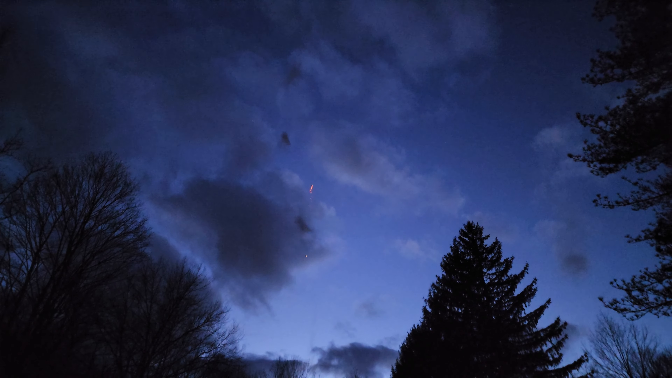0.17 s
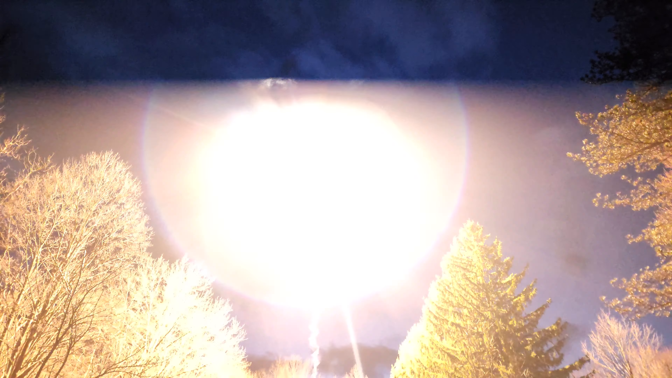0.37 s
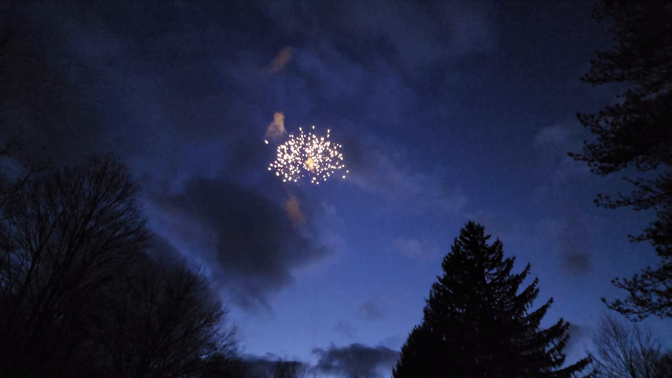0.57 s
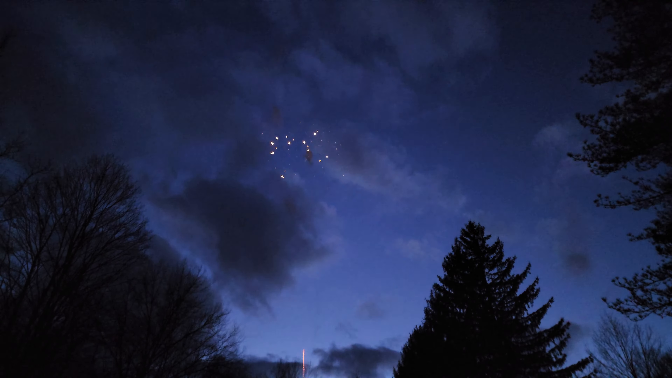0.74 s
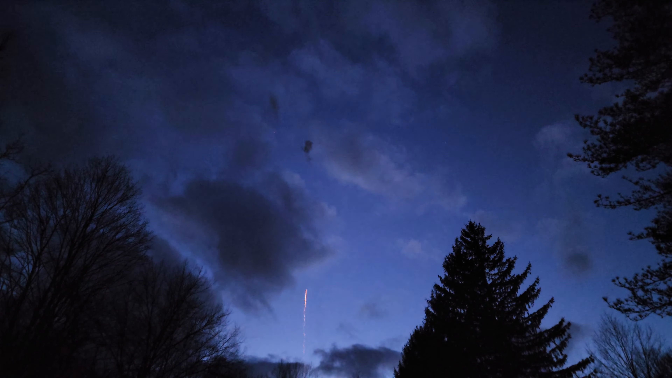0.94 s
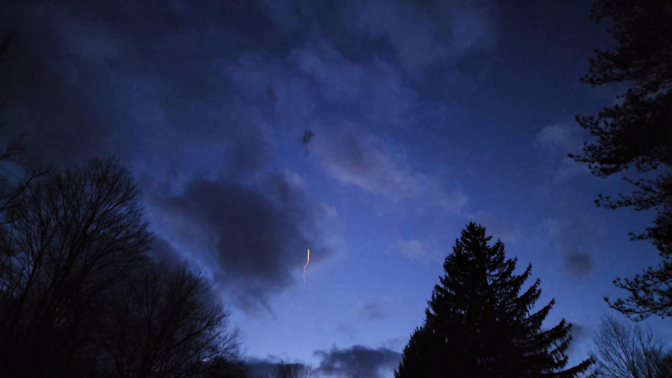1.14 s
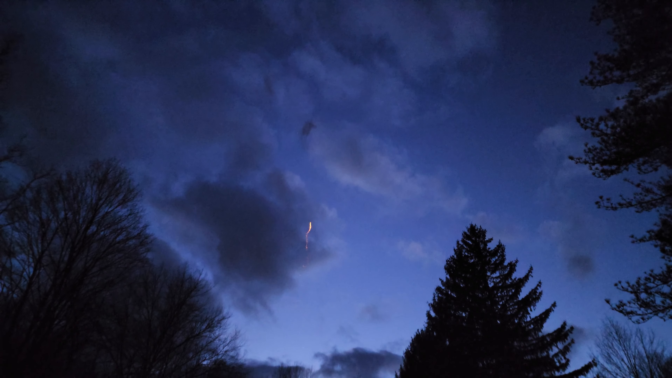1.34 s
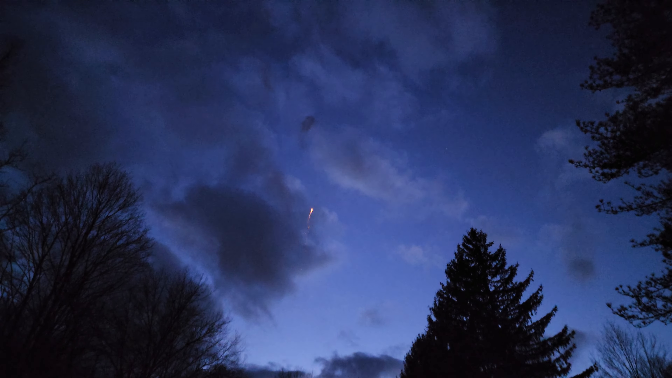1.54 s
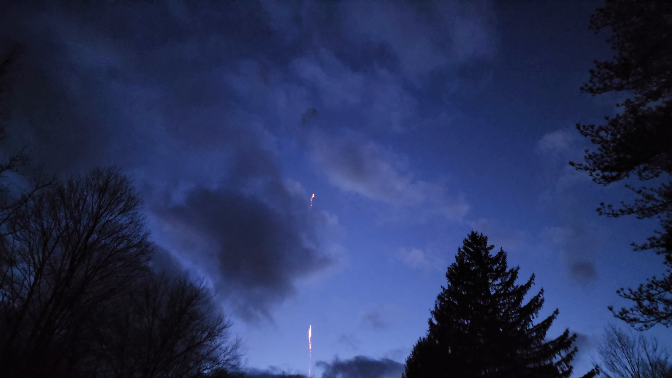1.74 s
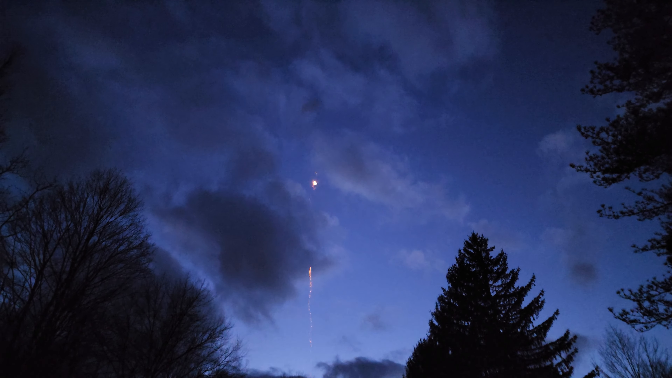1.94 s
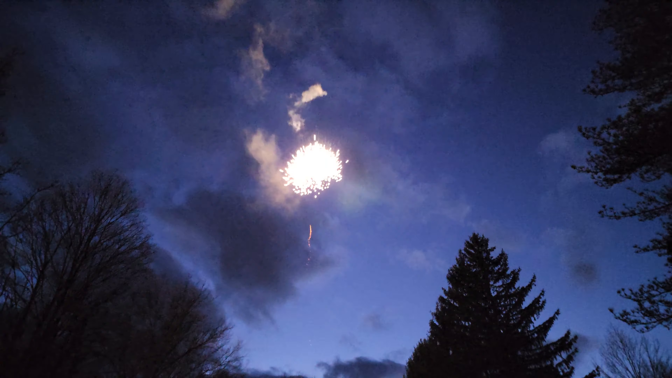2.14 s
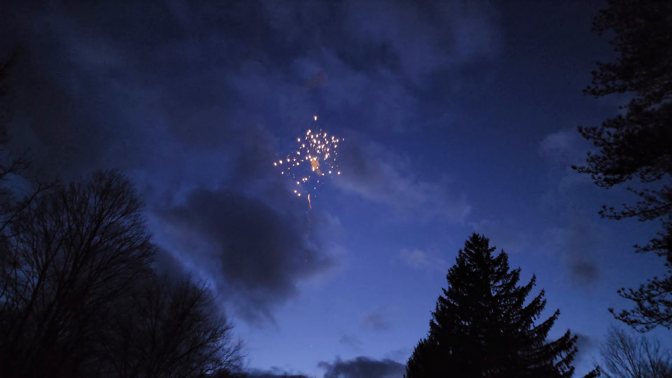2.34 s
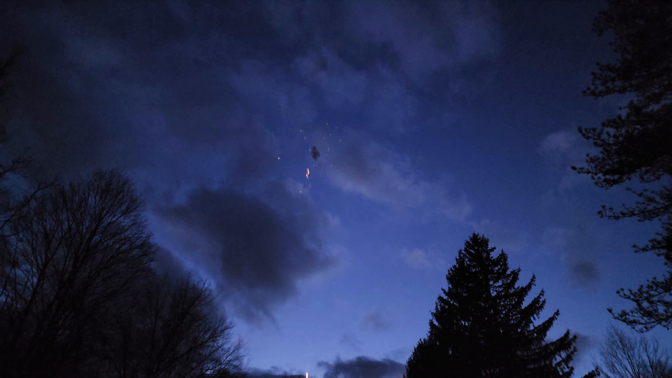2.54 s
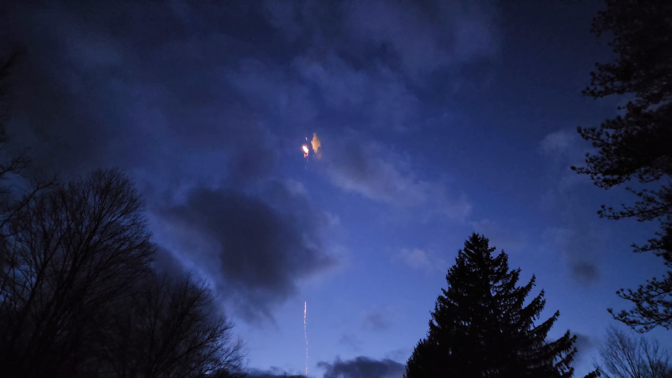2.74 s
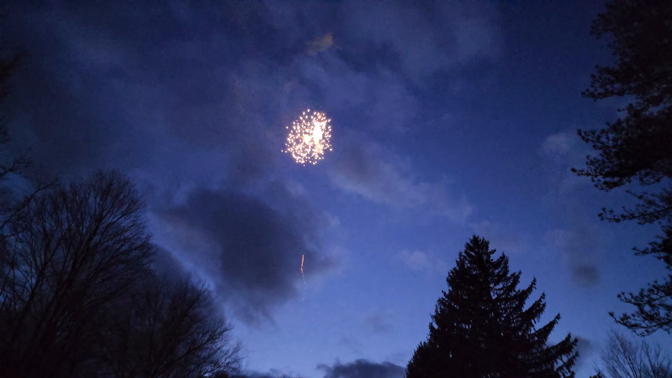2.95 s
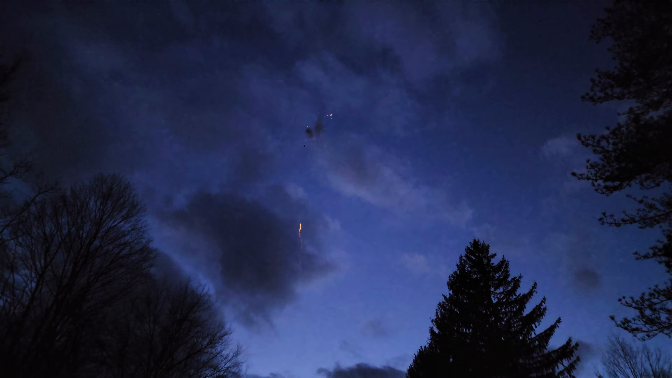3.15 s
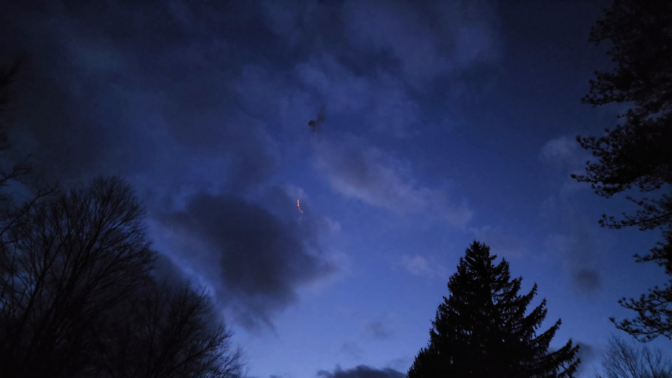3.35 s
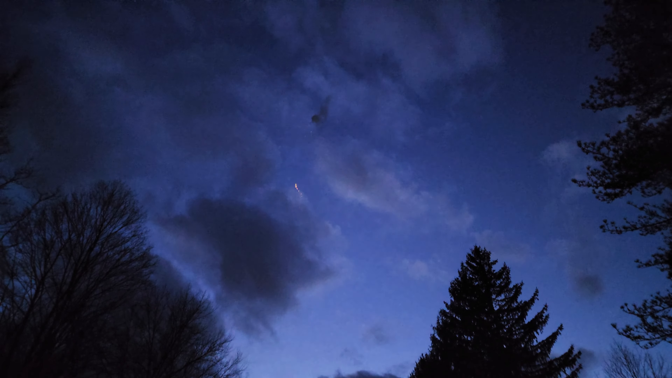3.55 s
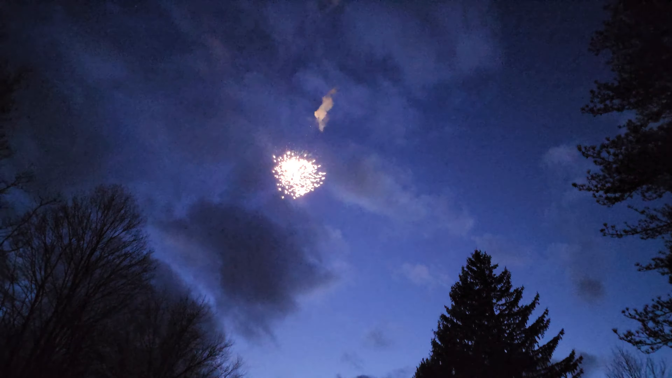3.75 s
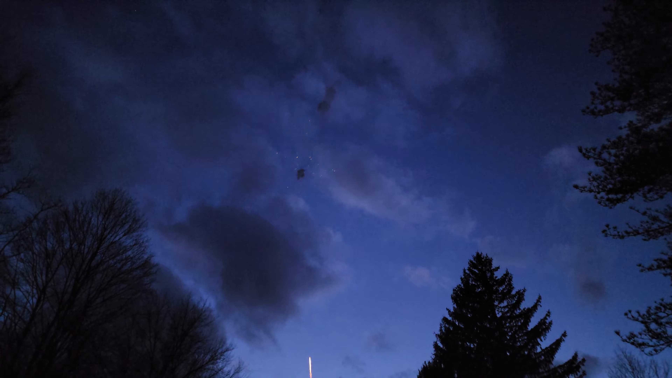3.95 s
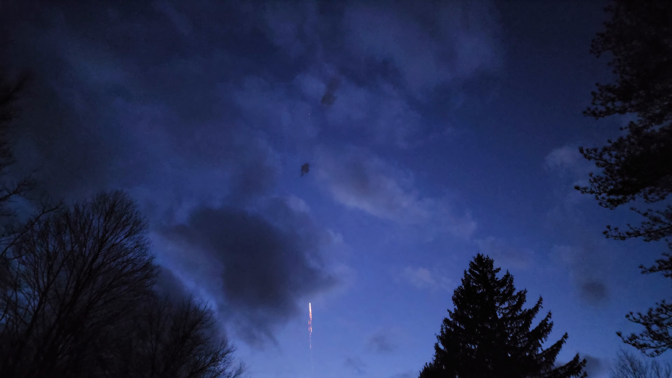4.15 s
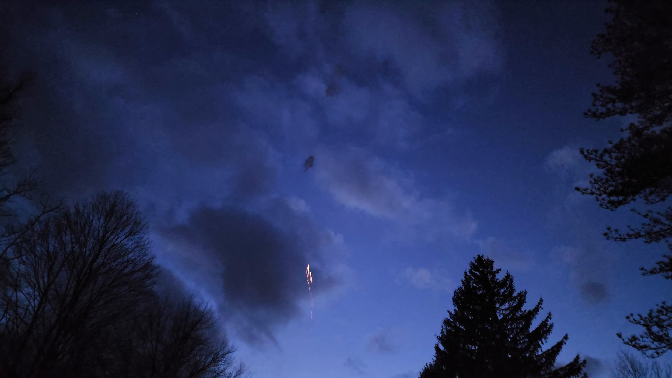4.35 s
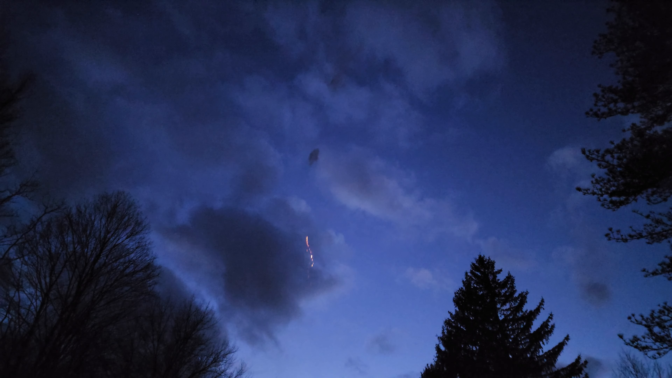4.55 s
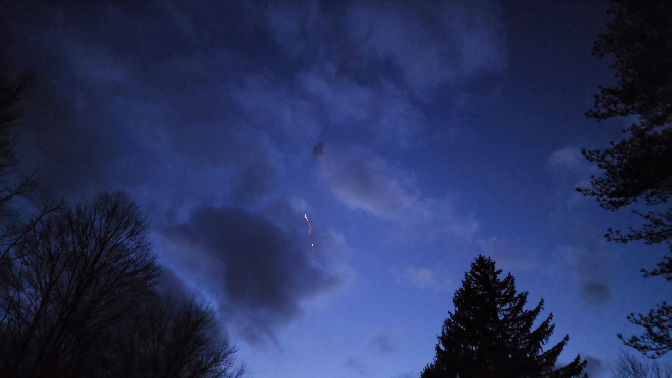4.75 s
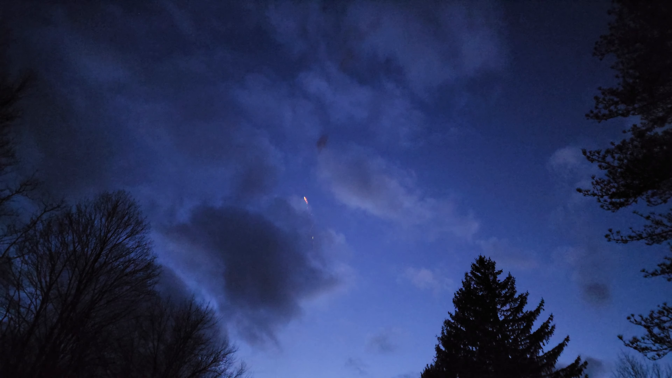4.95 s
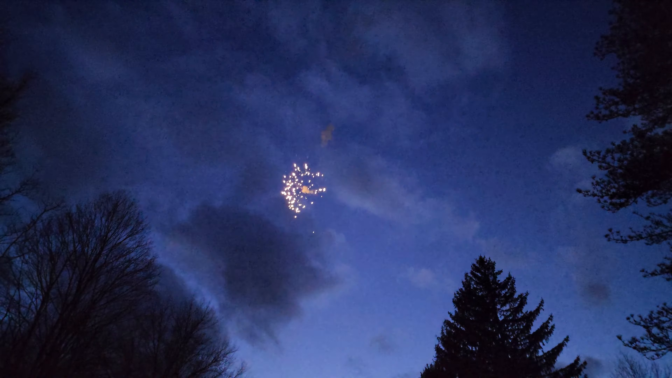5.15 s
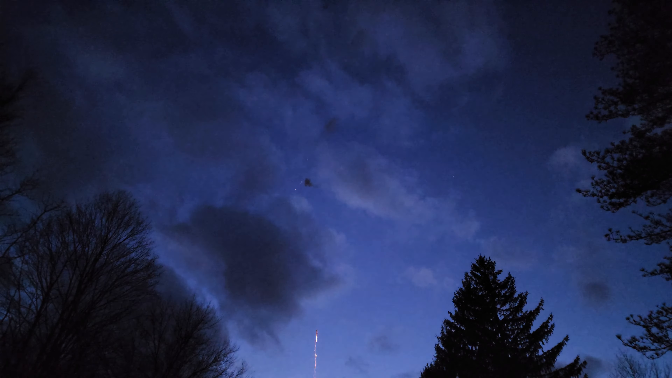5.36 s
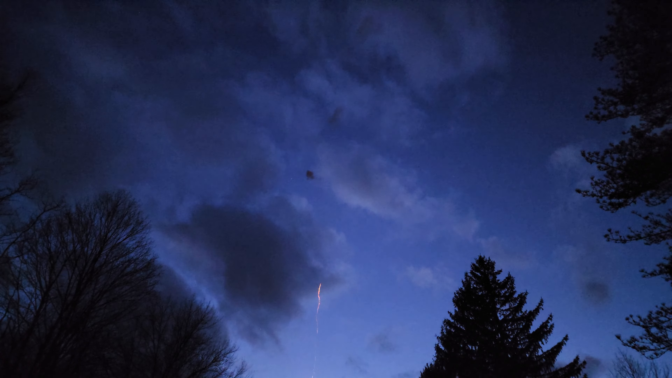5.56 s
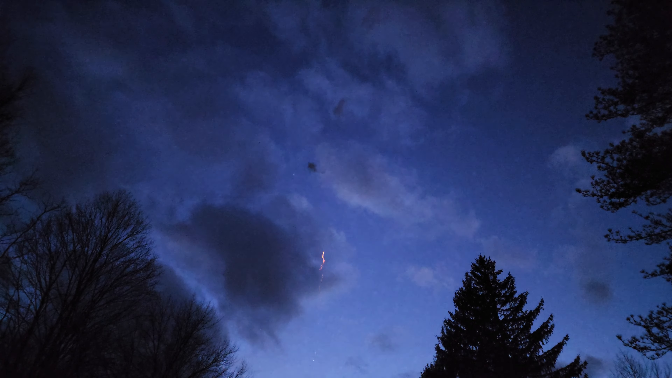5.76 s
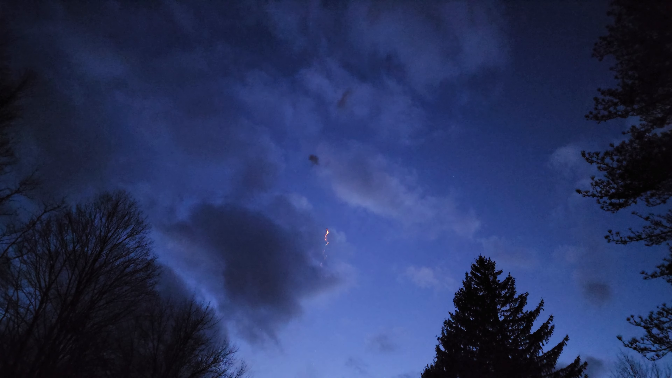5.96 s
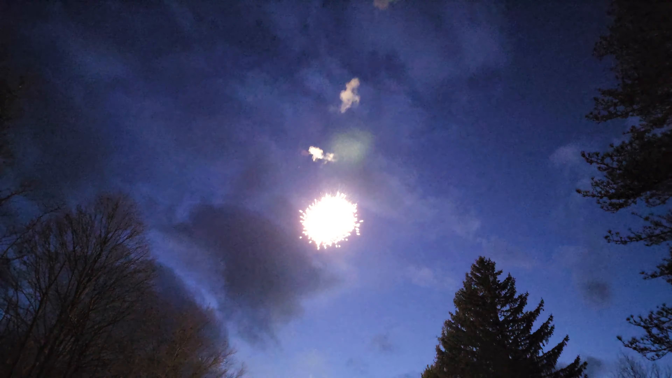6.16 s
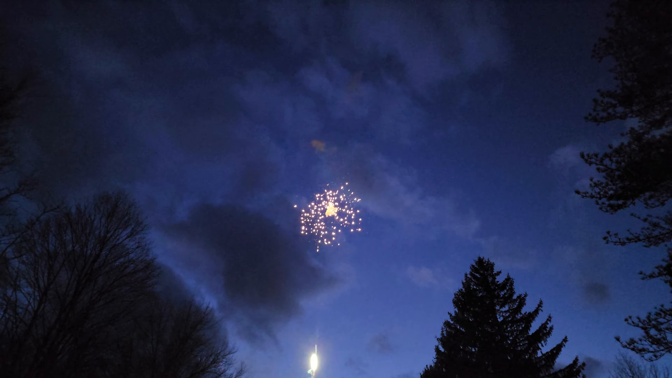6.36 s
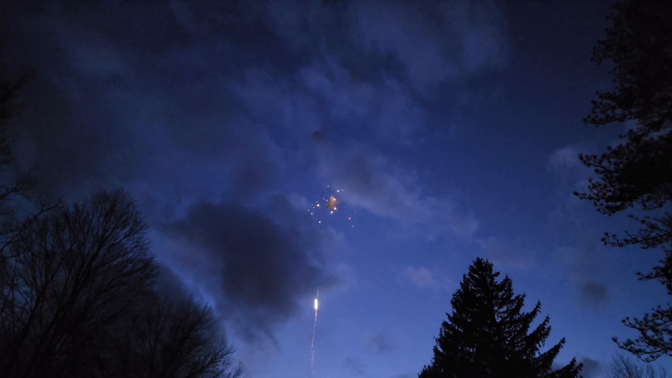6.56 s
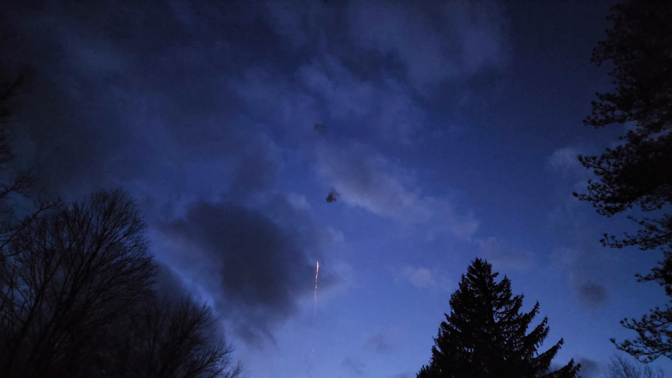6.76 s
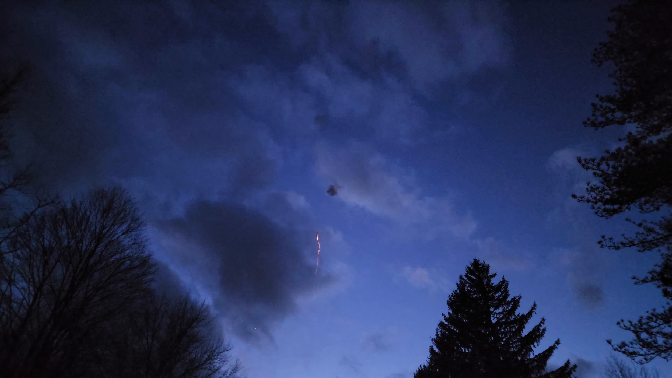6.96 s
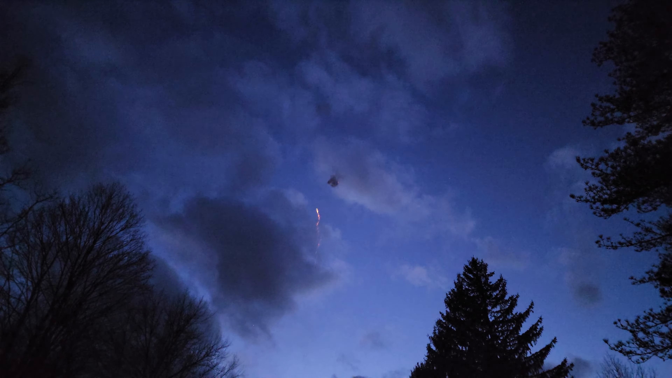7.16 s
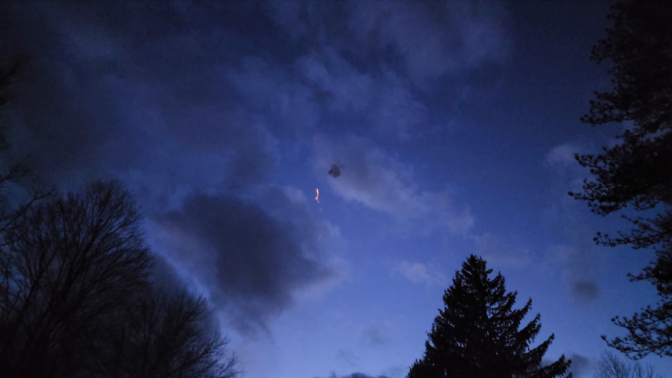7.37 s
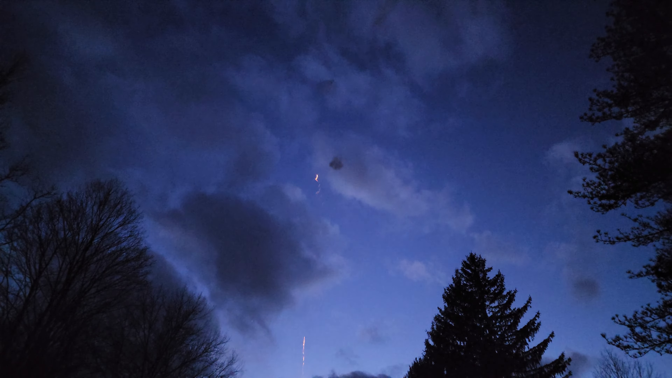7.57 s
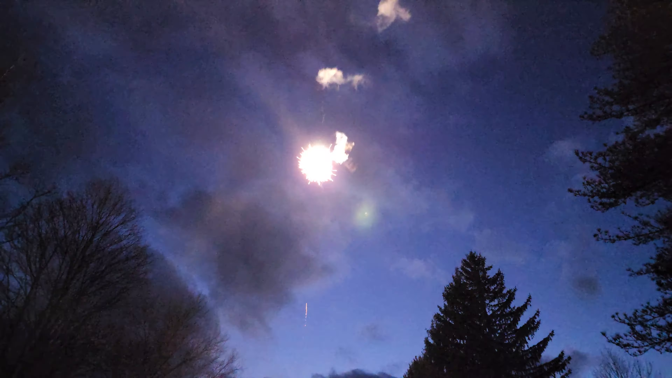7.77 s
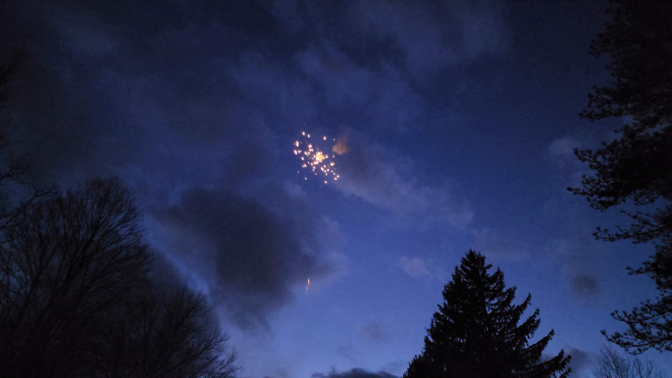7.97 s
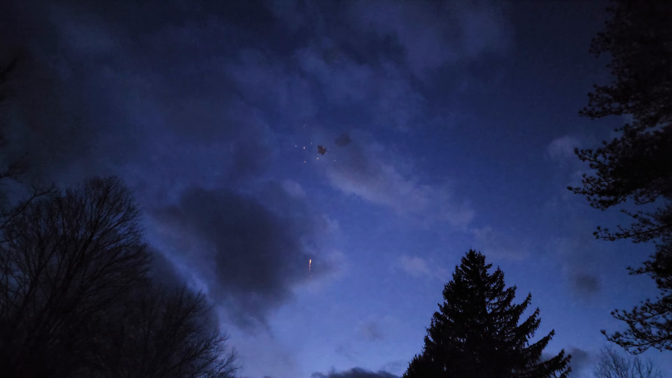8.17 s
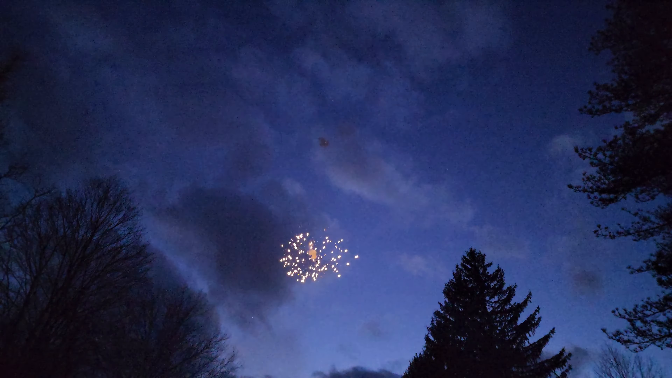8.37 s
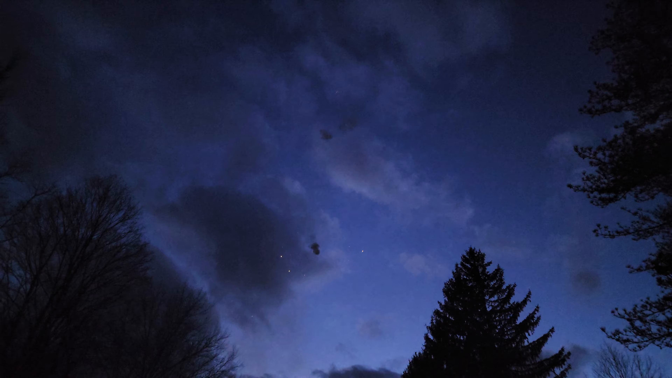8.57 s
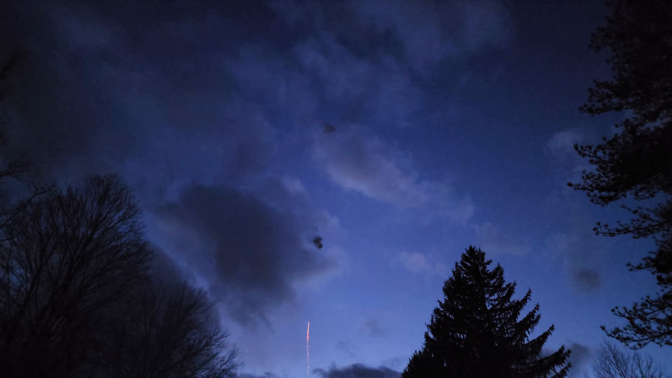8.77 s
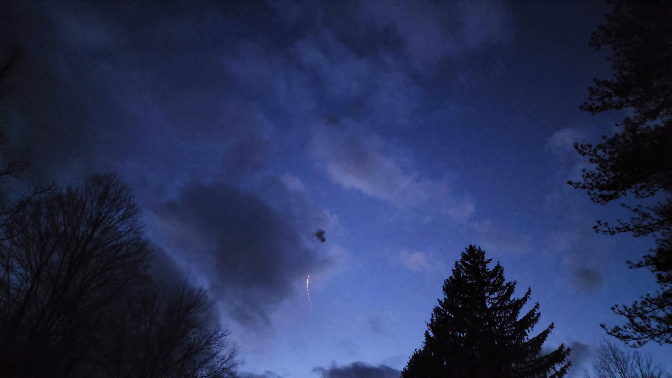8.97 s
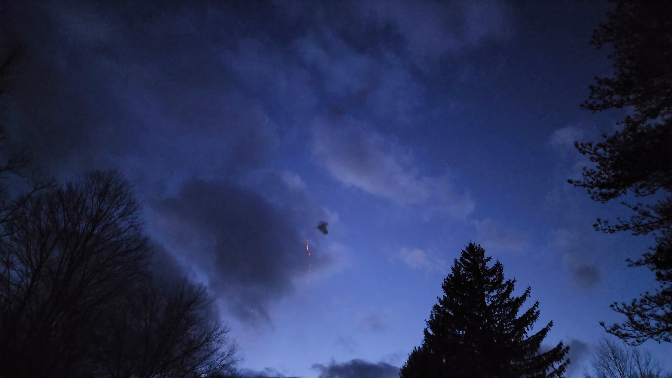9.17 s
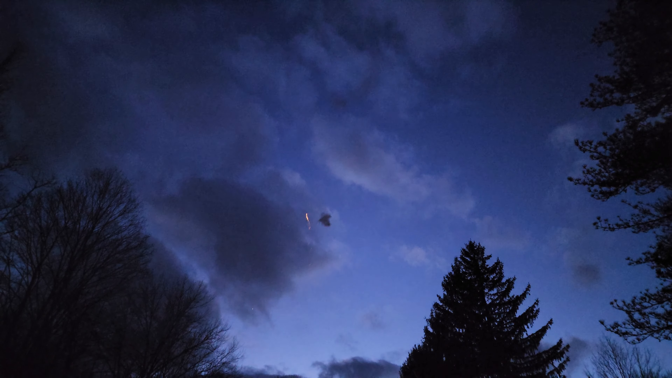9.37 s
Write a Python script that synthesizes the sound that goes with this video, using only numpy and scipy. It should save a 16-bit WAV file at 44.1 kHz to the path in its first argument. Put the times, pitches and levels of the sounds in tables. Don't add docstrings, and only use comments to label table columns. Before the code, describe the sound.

A firework cake fires at uneven intervals: a pop from the tube with a small crack and gas spit, then sharp overhead bursts that clip the small microphone. Echoes slap back within a third of a second from left and right, and the trees scatter a wide tail that loses brightness and dies away. Faint traffic and hiss lie beneath; tiny debris ticks are barely audible.

```python
import sys
import numpy as np
from scipy import signal
from scipy.fft import rfft, irfft, next_fast_len
from scipy.io import wavfile

SR = 44100
rng = np.random.default_rng(int(sys.argv[2]) if len(sys.argv) > 2 else 0)


def boost_factor(decibels):
    exponent = np.asarray(decibels, float) / 20
    return 10 ** exponent


def to_wav(s):
    ch = np.atleast_2d(s).T
    pcm = np.round(np.clip(ch, -1, 1) * 32767)
    wavfile.write(sys.argv[1], SR, pcm.astype(np.int16))


N = 415863

# f/Hz, level/dB per Hz
YARD_COLOUR = [(18, -18.5), (30, -27), (93, -9.5), (145, -15), (252, -13), (319, -23), (486, -20.5),
               (526, -26), (780, -24), (1220, -28), (1670, -31.5), (2610, -48.5), (16000, -89.5)]
# f/Hz, likeness/-1 to 1
LIKENESS = [(60, 1), (130, 0.97), (290, 0.87), (640, -0.069), (1410, -0.18), (3100, 0.094), (6820, -0.14),
            (15000, 0.26)]
# f/Hz, level/dB per Hz
SCATTER_COLOUR = [(40, -20), (106, -10.5), (243, 0), (340, 0.6), (560, -4.5), (1550, -12), (2300, -15.5),
                  (4700, -17.5), (5700, -22.5), (6300, -25.5), (9300, -28), (10200, -39.5), (11500, -23.5),
                  (15800, -32.5)]
# f/Hz, early fall/dB, time to fall 60 dB/s, lift tail against burst tail/dB
WOODS_DECAY = [(60, -8, 3.2, -10.5), (150.7, -7, 6.3, -10), (324, 4, 3.32, -1), (740, 4, 3.27, 1),
               (1700, 2.5, 4.35, 6), (3490, 12, 2.93, 5), (5650, 2, 1, 2.5), (8350, 3, 1.04, -3),
               (14200, 10.5, 0.53, -2.5)]
# t/s, tail level/dB
EARLIER_SHELLS = [
    (-0.67, -29.5),
]
# t/s, peak level/dB
DEBRIS = [
    (4.868, -84.),
    (5.8194, -80.),
    (7.1008, -72.),
    (7.2764, -80.),
    (7.559, -82.),
    (8.99, -78.),
]
# t/s, pop level/dB, muzzle crack level/dB, gas spit level/dB, tail level/dB
LIFTS = [
    (0.5573, -13.5, -17.5, -29, -43),
    (1.4751, -13.5, -20.5, -15, -47),
    (2.3922, -14, -20.5, -18.5, -47),
    (3.6597, -13.5, -22.5, -27, -46.5),
    (4.9897, -9.5, -18, -42, -42.5),
    (6.0737, -12.5, -17.5, -46, -45.5),
    (7.0118, -18.5, -30.5, -45.5, -55),
    (9.3256, -13.5, -17, -35.5, -43.5),
]
# multiple of crack pitch, level/dB, length/ms
MUZZLE_MODES = [(1., -4, 0.66), (1.72, -3, 0.42), (.3, -12, 2.3), (1.35, -4, 0.57), (2.05, -25.5, 2),
                (2.9, -32.5, 1.9)]
# delay/s, level/dB, f/Hz, left-right/dB
ECHOES = [
    (0.044, -39, 324, 4),
    (0.084, -32, 298, -2),
    (.1, -18, 346, 3.5),
    (0.114, -23, 162, -3),
    (.16, -36, 497, 0.),
    (0.209, -24.5, 414, -3),
    (.25, -37, 265, -8),
    (.285, -23, 275, -4),
    (.309, -24, 670, 0),
]
# multiple of port pitch, level/dB, length/ms
PORT_MODES = [(1., -11.5, 1.2), (1.6, -19, 0.66), (2.4, -18.5, 0.54), (.7, -33, 0.74)]
# t/s, ground bounce delay/ms, shadow on the right port/0-1, blast length ratio, tail level/dB
BURSTS = [
    (0.5842, 5.12, 0.65, 1.07, -33.5),
    (2.2043, 4.85, 0.3, 1.15, -28.5),
    (2.9916, 5.34, 0.7, 1.04, -31.5),
    (3.8254, 5.33, 0.78, 1.02, -34),
    (5.1863, 5.13, 0.95, 1.05, -31),
    (6.2382, 4.95, 0.98, 1.05, -32.5),
    (7.9145, 5.47, 1, 1, -28.5),
    (8.3838, 4.1, 0.3, 1.02, -31),
]

STEP = 64
FFT_SIZE = next_fast_len(N)
FFT_HZ = np.arange(FFT_SIZE // 2 + 1) * SR / FFT_SIZE + 1
MS = np.arange(1800) / SR * 1000
TOP_HZ = 15900
NEAR_TRUNKS_S = .118


def at_hz(points, hz, column=1):
    table = np.array(points)
    return np.interp(np.log(hz), np.log(table[:, 0]), table[:, column])


def upsample(slow):
    return np.interp(np.arange(N) / STEP, np.arange(len(slow)), slow)


def drift(rate_hz):
    r = np.exp(-2 * np.pi * rate_hz * STEP / SR)
    slow = signal.lfilter([1], [1, -2 * r, r * r], rng.standard_normal(N // STEP + 502))[500:]
    return slow / slow.std()


def coloured(colour):
    notch_hz, notch_db, notch_width_hz = 2367, -11, 630
    alike = np.clip(at_hz(LIKENESS, FFT_HZ), -.99, .99)
    above = np.exp(-np.maximum(FFT_HZ - notch_hz, 0) / notch_width_hz)
    below = 1 + (notch_hz / FFT_HZ) ** 40
    gain = boost_factor(at_hz(colour, FFT_HZ) + notch_db * above / below) * (FFT_HZ < TOP_HZ)
    mid, side = rfft(rng.standard_normal((2, FFT_SIZE))) * gain
    out = mid * np.sqrt(1 + alike) + side * np.sqrt(1 - alike) * [[1], [-1]]
    return out / irfft(out, FFT_SIZE).std()


def add(out, s, sound):
    i = round(s * SR)
    out[:, i:i + sound.shape[-1]] += sound[..., :max(N - i, 0)]


def swing(hz, start_ms, grow_ms, power):
    t = np.maximum(MS - start_ms, 0)
    return np.sin(2 * np.pi * hz * t / 1000) * (t / grow_ms * np.exp(1 - t / grow_ms)) ** power


def front(start_ms, width_ms, rise_ms):
    t = np.maximum(MS - start_ms, 0)
    return (1 - np.exp(-(t / rise_ms) ** 2)) * np.exp(-(t / width_ms) ** 2)


def suction(hz, start_ms, last_ms, squareness):
    t = np.maximum(MS - start_ms, 0)
    return -np.tanh(squareness * np.sin(2 * np.pi * hz * t / 1000)) * np.exp(-(t / last_ms) ** 3)


def ring(modes, pitch_hz, start_ms, grow_ms):
    t = np.maximum(MS - start_ms, 0)
    chance = rng.normal(0, 1, (len(modes), 2)) * [.9, .012]
    rings = 0
    for (multiple, level_db, length_ms), (louder_db, sharper) in zip(modes, chance):
        hz = pitch_hz * multiple * (1 + sharper)
        fade = np.exp(-(t / length_ms) ** 2)
        rings = rings + boost_factor(level_db + louder_db) * fade * np.sin(2 * np.pi * hz * t / 1000)
    return rings * (1 - np.exp(-t / grow_ms))


def quiet_yard():
    noise = irfft(coloured(YARD_COLOUR), FFT_SIZE)[:, :N]
    return boost_factor(-47.5) * noise * upsample(boost_factor(0.51 * drift(3.9)))


def clumps(per_s, length_s):
    hits = rng.uniform(0.21, 2.4, N // STEP + 2) * (rng.random(N // STEP + 2) < per_s * STEP / SR)
    swells = np.convolve(hits, np.hanning(round(length_s * SR / STEP)), "same")
    return swells / swells.mean()


def tail_power(s, hz, swell_s, near_db, near_s):
    t = np.maximum(np.arange(N // STEP + 2) * STEP / SR - s, 0)
    near = near_db / (1 + (t / near_s) ** 8)
    far_ridge = 2.5 * np.exp(-((t - .45) / .18) ** 2) / (1 + (hz / 500) ** 2)
    early_fall = at_hz(WOODS_DECAY, hz) * (1 - np.exp(-t / 0.18))
    late_fall = 60 * t / at_hz(WOODS_DECAY, hz, column=2)
    level_db = near + far_ridge - early_fall - late_fall
    return boost_factor(2 * level_db) * (1 - np.exp(-(t / swell_s) ** 2))


def woods():
    noise = coloured(SCATTER_COLOUR)
    low_bunches, high_bunches = clumps(28, .035), clumps(35, .024)
    out = 0
    for hz in 25 * np.sqrt(2) ** np.arange(1, 20):
        share = np.cos(np.pi * np.clip(np.log2(FFT_HZ / hz), -.5, .5)) ** 2
        tilt_db = 0.3 * np.log2(hz / 500)
        lift_db = at_hz(WOODS_DECAY, hz, column=3)
        lift_near_db = 1.7 * np.log2(2 + hz / 1000)
        power = 0
        for s, *_, db in BURSTS:
            power = power + boost_factor(2 * (db + tilt_db)) * tail_power(s, hz, 0.0045, 4., NEAR_TRUNKS_S)
        for s, db in EARLIER_SHELLS:
            power = power + boost_factor(2 * db) * tail_power(s, hz, .012, 3., .12)
        for s, *_, db in LIFTS:
            tail = tail_power(s + 0.0081, hz, 0.043, lift_near_db, NEAR_TRUNKS_S)
            power = power + boost_factor(2 * (db + lift_db)) * tail
        bunched = .45 / (1 + (hz / 1300) ** 2)
        power = power * (1 - bunched + bunched * (low_bunches if hz < 450 else high_bunches))
        flutter = boost_factor(0.48 * drift(20) / (1 + hz / 2000))
        out = out + irfft(noise * share, FFT_SIZE)[:, :N] * upsample(np.sqrt(power) * flutter)
    return out


def cinders():
    out = np.zeros((2, N))
    for s, db in DEBRIS:
        tick = np.diff(rng.standard_normal((2, len(MS) + 2)), 2) * np.exp(-MS / 1.2)
        add(out, s, boost_factor(db - 6) * tick)
    return out


def smears():
    block, block_start, shortest = 1024, 790, 350
    out = np.zeros((2, N))
    for s, *_, tail_db in BURSTS:
        length = (round(s * SR) - block_start - shortest) % block + shortest
        t = np.arange(length) / SR
        hz = np.geomspace(150, 13000, 60) * rng.normal(1, .03, (2, 60))
        phase = rng.uniform(0, 2 * np.pi, (2, 60))
        level_db = tail_db - 13.5 - 3.7 * np.log2(hz / 1000) + rng.normal(0, 8., size=60) - 11
        tones = np.sin(2 * np.pi * hz[..., None] * t + phase[..., None])
        bands = (boost_factor(level_db)[..., None] * tones).sum(axis=1)
        add(out, s - len(t) / SR, bands * np.sin(np.pi / 2 * t / t[-1]) ** 2.1)
    return out


def lifts():
    crack_hz = 4356
    out = np.zeros((2, N))
    for s, pop_db, crack_db, spit_db, _ in LIFTS:
        ports = []
        for lag_ms, louder_db in ((0, 1.5), (.06, 5.6)):
            pop = swing(570, lag_ms, 1.24, 3.04) + 0.19 * swing(570, lag_ms + 3.4, 0.4, 0.65)
            pop = pop + 0.52 * front(lag_ms, 0.52, 0.069)
            crack = ring(MUZZLE_MODES, crack_hz, lag_ms, 0.086)
            ports.append(boost_factor(pop_db) * pop + boost_factor(crack_db + louder_db) * crack)
        spit = np.diff(rng.standard_normal((2, len(MS) + 1))) * front(0.16, 0.64, 0.89)
        add(out, s, np.array(ports) + boost_factor(spit_db) * spit)
    return out


def echoes():
    out = np.zeros((2, N))
    for s, *_, tail_db in BURSTS:
        for delay_s, echo_db, hz, pan_db in ECHOES:
            thud = swing(hz, 0, 600. / hz, 2.2) * boost_factor(echo_db + tail_db + 26 + rng.normal(0, 2))
            late_s = rng.normal(0, 0.00203)
            add(out, s + delay_s + late_s, thud * boost_factor(np.array([[.5], [-.5]]) * pan_db))
    return out


def bursts():
    port_hz = 5200
    out = np.zeros((2, N))
    for s, bounce_ms, shadow, long, _ in BURSTS:
        lit = 3.1 * front(-0.059, 0.27 * long, 0.13)
        lit = lit + 0.65 * suction(320 / long, 0.31 * long, 2.27 * long, 2.9)
        shaded = 1.3 * suction(290, .07, 1.2, 2.5) + .24 * swing(270, 1.7, 1., 1.5)
        shaded = shaded + 1.9 * front(.24, .13, .06)
        left = lit + 0.65 * ring(PORT_MODES, port_hz, .1, 0.14)
        right = (1 - shadow) * lit + shadow * shaded + 0.65 * ring(PORT_MODES, .8 * port_hz, 0.051, 0.12)
        add(out, s, np.array([left, right]))
        bounce = []
        for lag_ms in (0, .12):
            push = 4.5 * front(lag_ms - .1, 0.26, .19)
            pull = 0.5 * suction(305 / long, lag_ms + 0.33, 2.87 * long, 1.7)
            rattle = 0.61 * ring(PORT_MODES, .85 * port_hz, lag_ms + 0.15, 0.24)
            bounce.append(push + pull + rattle)
        add(out, s + bounce_ms / 1000, np.array(bounce))
    return out


def scene():
    return quiet_yard() + woods() + cinders() + lifts() + echoes() + bursts()


def top_cut(x):
    return signal.sosfilt(signal.butter(12, 16990, fs=SR, output="sos"), x)


def record(dry):
    thin = signal.sosfilt(signal.butter(2, 38, "high", fs=SR, output="sos"), dry)
    overloaded = .97 * np.tanh(thin / .95)
    cut = signal.sosfilt(signal.cheby2(10, 60, TOP_HZ + 1050, fs=SR, output="sos"), overloaded)
    mix = np.clip(cut + smears(), -1, 1)
    return top_cut(mix)


dry = scene()
out = record(dry)
to_wav(out)
```